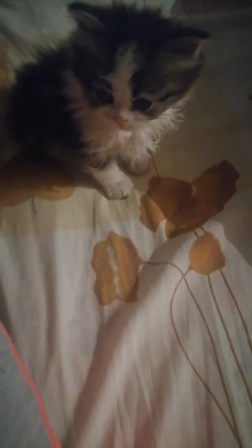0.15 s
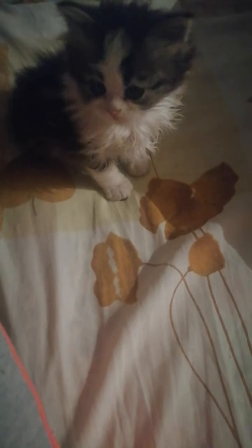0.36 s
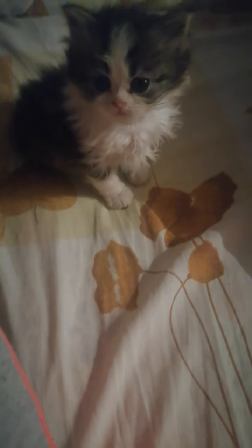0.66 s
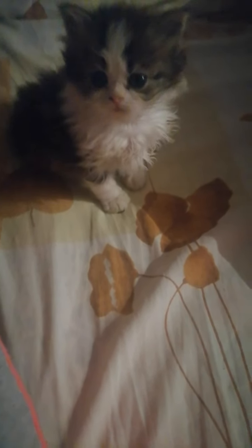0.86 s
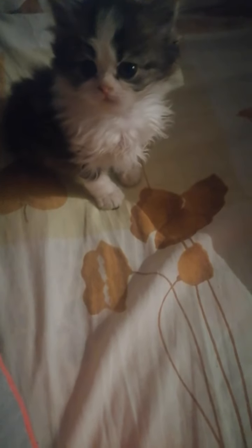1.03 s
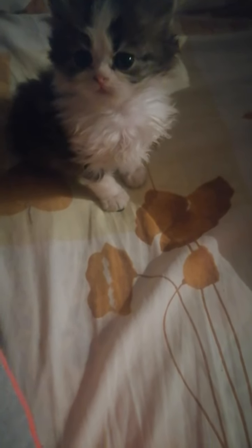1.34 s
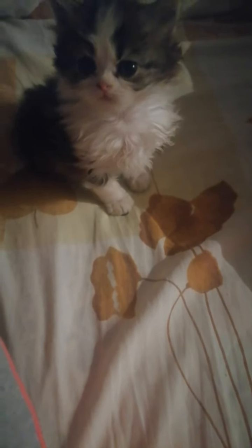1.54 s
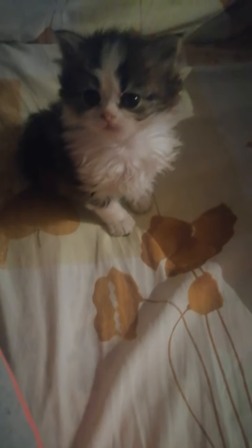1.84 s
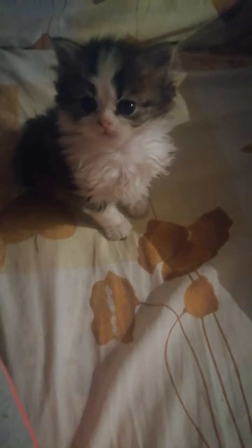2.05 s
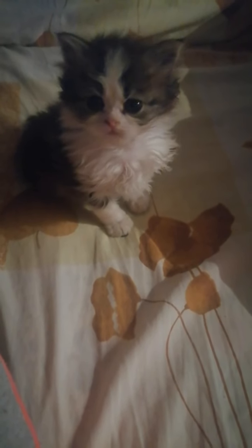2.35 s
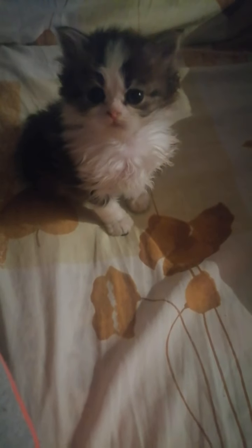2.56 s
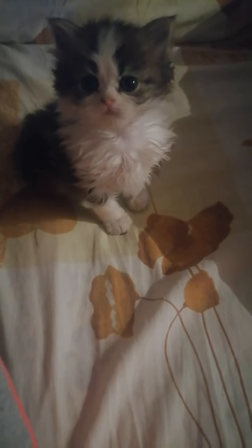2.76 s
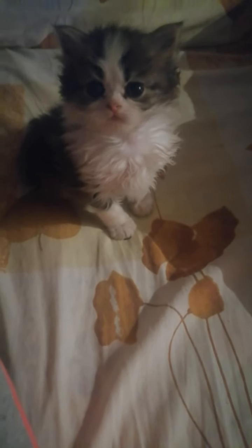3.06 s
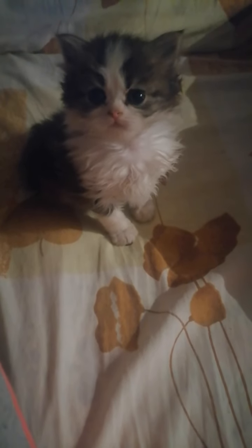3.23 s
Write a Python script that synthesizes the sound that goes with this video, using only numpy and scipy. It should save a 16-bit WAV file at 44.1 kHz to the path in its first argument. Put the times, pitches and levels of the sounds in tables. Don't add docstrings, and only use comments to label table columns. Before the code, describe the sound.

Kitten giving two brief, thin, high meows on a bed, with faint distant traffic behind.

```python
import sys
import numpy as np
from scipy import signal
from scipy.io import wavfile
from scipy.ndimage import uniform_filter1d

SR = 44100
rng = np.random.default_rng(int(sys.argv[2]) if len(sys.argv) > 2 else 0)


def ratio(d):
    e = np.asarray(d, float) / 20
    return 10 ** e


def dump_mix(stems):
    frames = np.atleast_2d(stems).T
    limited = np.clip(frames, -1, 1)
    pcm = np.round(limited * 32767).astype(np.int16)
    wavfile.write(sys.argv[1], SR, pcm)


N = 149940

# start_s [s], traffic_db [dB], air_db [dB]
SWELLS = [
    (0, -1.5, 5),
    (.4, -2.5, 7.5),
    (1.1, -5, 9.5),
    (1.45, -2.5, 2),
    (1.8, 0, 1.5),
    (2.7, -5, 0),
    (2.95, 1, -3),
    (3.4, -1.5, 3),
]


def track(rows, col):
    rows = np.array(rows, float)
    return np.interp(np.arange(N) / SR, rows[:, 0], rows[:, col])


def by_hz(table, hz):
    table = np.array(table)
    return np.interp(np.log(hz), np.log(table[:, 0]), table[:, 1])


def unit(x):
    return x / np.sqrt(np.mean(x ** 2))


def walk(rate_hz):
    k = max(int(SR / rate_hz), 1)
    once = uniform_filter1d(rng.standard_normal(N), k)
    return unit(uniform_filter1d(once, k))


def band(x, hz, width_hz):
    return signal.lfilter(*signal.iirpeak(min(hz, .45 * SR), hz / width_hz, SR), x)


def room_noise(hz, width_hz, swell_db):
    # pitch_hz [Hz], likeness [0 to 1]
    alike = [
        (130, .84),
        (290, .73),
        (640, .4),
        (1400, .15),
        (3000, 0),
    ]
    # pitch_hz [Hz], left_minus_right_db [dB]
    lean = [(200, -3), (700, -1), (2400, -3.5), (8100, 1)]
    likeness = np.clip(by_hz(alike, hz), -.9, .99)
    mid, side = band(rng.standard_normal((2, N)), hz, width_hz)
    both = np.sqrt(1 + likeness) * mid + np.sqrt(1 - likeness) * side * np.array([[1], [-1]])
    lean_db = by_hz(lean, hz) * np.array([[.5], [-.5]])
    return unit(both) * ratio(swell_db + lean_db)


def room_air():
    # pitch_hz [Hz], level_db [dB per Hz]
    room = [(12, -29), (20, 5.5), (106, -24), (137, -15.5), (166, -14), (427, -15.5), (519, -11),
            (958, -18.5), (15500, -27.5)]
    # pitch_hz [Hz], gain_db [dB]
    shell = [(2800, 5.5), (3550, -3.5), (4500, 0.5), (9000, -0.5), (11300, -7), (15500, -0.5)]
    air = 0
    for hz in 22 * 2 ** np.arange(0, 9.6, 1 / 3):
        high = hz / (hz + 3300.0)
        traffic_db = track(SWELLS, 1) + 3.6 * walk(7.6)
        air_db = track(SWELLS, 2) * (hz < 1e4)
        swell_db = (1 - high) * traffic_db + high * air_db
        noise = band(room_noise(hz, hz / 3, swell_db), hz, hz / 3)
        air = air + ratio(by_hz(room, hz) + by_hz(shell, hz)) * np.sqrt(hz) * noise
    return unit(air) * ratio(-63)


def engine_drone():
    # pitch_hz [Hz], width_hz [Hz], level_db [dB]
    room_rings = [(26, 11, -68.5), (53, 12, -62), (100.4, 18, -67), (138.25, 3, -62), (198.5, 18, -71.5),
                  (287.7, 15, -75.5), (340, 18, -78), (408, 12, -83.5), (2700, 420, -76.5),
                  (4800, 500, -79), (14800, 700, -87)]
    return sum(ratio(db) * room_noise(hz, width_hz, track(SWELLS, 1) / (1 + hz / 1300.0))
               for hz, width_hz, db in room_rings)


def street_hums():
    # middle_s [s], half_length_s [s], pitch_hz [Hz], width_hz [Hz], level_db [dB]
    hums = [(1.25, .16, 345, 50, -66), (2.93, .12, 430, 12, -67), (3.0, .02, 2205, 30, -75),
            (1.5, .13, 6645, 12, -78), (1.06, .04, 55, 25, -58), (1.3, .05, 136, 10, -62),
            (1.46, .03, 55, 25, -61), (.46, .04, 136, 10, -62), (1.12, .08, 3200, 700, -77),
            (1.8, .15, 1250, 200, -78), (2.72, .05, 620, 30, -72), (2.9, .1, 220, 160, -68),
            (1.15, .12, 90, 80, -64)]
    t = np.arange(N) / SR
    return sum(ratio(db) * room_noise(hz, width_hz, 0) * np.exp(-((t - middle_s) / half_s) ** 2)
               for middle_s, half_s, hz, width_hz, db in hums)


def vehicle_whine():
    # start_s [s], pitch_hz [Hz], level_db [dB]
    whine = [
        (1.05, 1023, -81),
        (1.22, 988, -71.5),
        (1.42, 949, -81.5),
        (1.56, 900, -74),
        (1.7, 717, -70),
        (1.85, 618, -82.5),
        (1.95, 626, -85),
    ]
    t = np.arange(N) / SR
    hz = track(whine, 1) * (1 + .018 * walk(45))
    tone = np.sin(2 * np.pi * np.cumsum(hz) / SR)
    heard = (t > whine[0][0]) * (t < whine[-1][0])
    return tone * ratio(track(whine, 2) + 5 * walk(14)) * heard


def bedroom():
    return room_air() + engine_drone() + street_hums() + vehicle_whine()


def ticks():
    # start_s [s], peak_db [dB], pitch_hz [Hz], left_minus_right_db [dB]
    tick_list = [(0.052, -59, 4800, 1), (.1435, -54, 8550, 3), (.144, -69, 13000, 0),
                 (.218, -35.5, 7850, -11), (0.228, -51, 8400, -17), (.565, -43, 7810, -7),
                 (.579, -53, 8100, 4), (.468, -54, 7800, 1), (.777, -57.5, 6560, 6), (.975, -69.5, 7500, 8),
                 (1.059, -58, 5200, -6), (1.526, -60.5, 4910, 2.5), (1.962, -53.5, 5620, -10),
                 (1.973, -56, 5510, -6), (3.293, -61.5, 4680, 11)]
    lead_s, half_length_s, sharpness = .005, .0007, 2.6
    out, t = np.zeros((2, N)), np.arange(4000) / SR
    for start_s, db, hz, pan_db in tick_list:
        burst = rng.standard_normal(4000) * np.exp(-((t - lead_s) / half_length_s) ** 2)
        for _ in range(3):
            burst = band(burst, hz, hz / sharpness)
        sides_db = db + np.array([[pan_db], [-pan_db]]) / 2
        i = int((start_s - lead_s) * SR)
        out[:, i:i + 4000] += ratio(sides_db) * burst / np.abs(burst).max()
    return out


def bedding_bumps():
    # start_s [s], peak_db [dB], pitch_hz [Hz]
    bumps = [
        (.319, -52, 750),
        (1.048, -52, 54),
        (1.18, -50, 50),
        (2.494, -42, 950),
    ]
    out, t = np.zeros((2, N)), np.arange(4000) / SR
    for start_s, db, hz in bumps:
        i = int(start_s * SR)
        out[:, i:i + 4000] += ratio(db) * np.sin(2 * np.pi * hz * t) * np.exp(-t * hz / 2.6)
    return out


def bell(hz, centre_hz, width_hz):
    return 1 - (hz / centre_hz) ** 2 + 1j * hz * width_hz / centre_hz ** 2


def vocal_tract(hz, centres_hz, widths_hz, leak):
    nose_hz, nose_width_hz = 2560, 600
    notch_hz = nose_hz + 890 * leak
    notch_width_hz = nose_width_hz + (400 - nose_width_hz) * np.abs(leak)
    nose = bell(hz, notch_hz, notch_width_hz) / bell(hz, nose_hz, nose_width_hz)
    rings = [bell(hz, centre, width) for centre, width in zip(centres_hz, widths_hz)]
    return nose / np.prod(rings, axis=0)


def meow(pitch, voice, mouth, palate, lips):
    # throat, third resonance [Hz]
    upper_widths_hz = [400, 1240]
    # left_db [dB], right_db [dB],
    # left_change_db and right_change_db [dB per % of pitch]
    bedding_path = [(-0.4, 0.5, 0.5, 0.7), (-3.1, 3.5, -0.2, 0.1), (-14.3, -1.7, -0.1, -0.9),
                    (-9.0, -16.7, 0.9, -0.2), (-13.2, -5.7, 1.2, 1.1), (-20.3, -12.0, -1.0, -0.6),
                    (-14.7, -15.6, -0.1, -1.0), (-1.1, -4.8, -0.3, 0.3), (-7.0, 1.2, -0.4, 0.6),
                    (-14.9, 2.9, -0.4, -0.6), (-13.6, 5.4, -0.1, -0.7), (-8.5, 12.5, -0.6, -0.1),
                    (5.4, 7.2, 2.1, -2.2), (13.0, 5.9, 0.5, 1.9), (12.4, 6.2, -0.9, 0.3),
                    (9.8, 4.2, -0.0, 0.1), (0.2, -2.0, 0.0, -0.0)]
    # middle_s [s], hoarseness_db [dB], half_length_s [s]
    catches = [
        (.667, -21, .004),
        (.685, -30, .003),
        (.70, -28, .004),
        (2.056, -14, .002),
        (2.09, -28, .005),
        (2.145, -30, .003),
        (2.162, -24, .005),
        (2.25, -28, .004),
        (2.295, -26, .003),
        (2.425, -28, .004),
    ]
    # start_s [s], level_db [dB re 1 radian]
    hoarseness = [
        (.45, -40),
        (.55, -41),
        (.64, -36),
        (.72, -38),
        (.85, -46),
        (2.05, -38),
        (2.2, -35),
        (2.28, -32),
        (2.4, -35),
        (2.5, -46),
    ]
    # pitch_hz [Hz], lag [radians]
    port_lag = [(600, -.1), (4300, 2.2), (5300, 1.9), (7400, 4.5), (8600, 5.6), (10500, 6.2)]
    shut_hz, shut_damp_hz = 900, 900
    pulse_skew = -1.0
    start_s, end_s = voice[0][0], voice[-1][0]
    span = slice(int((start_s - .03) * SR), int((end_s + .03) * SR))
    t = (np.arange(N) / SR)[span]

    def soft(rows, col):
        return uniform_filter1d(track(rows, col), size=400)[span]

    hz = uniform_filter1d(soft(pitch, 1), size=700) * (1 + .0015 * walk(5.7)[span])
    phase = 2 * np.pi * np.cumsum(hz) / SR
    on = uniform_filter1d(1. * (t > start_s) * (t < end_s), size=300)
    catch = sum(ratio(db) * np.exp(-((t - middle_s) / half_s) ** 2) for middle_s, db, half_s in catches)
    hoarse = ratio(soft(hoarseness, 1) + 1.2 * walk(51)[span]) + catch
    chance = walk(1100)[span]
    gust = walk(700) + 1j * walk(700)
    breath = ratio(soft(palate, 3) + 4 * walk(45)[span]) + ratio(-4) * catch

    opened = np.clip((t - lips[0]) / lips[1], 0, 1)
    centres_hz = [shut_hz + (soft(mouth, 1) - shut_hz) * opened, soft(mouth, 2), soft(mouth, 3)]
    leak = np.clip(soft(palate, 2), -1, 1.1)
    mouth_width_hz = soft(palate, 1) + shut_damp_hz * (1 - opened)
    throat_width_hz = upper_widths_hz[0] * (1 - .5 * np.maximum(leak, 0))
    widths_hz = [mouth_width_hz, throat_width_hz, upper_widths_hz[1]]

    size = np.sqrt(2) * ratio(soft(voice, 1)) * on / np.abs(vocal_tract(hz, centres_hz, widths_hz, leak))
    off_percent = 100 * (hz / 612 - 1)
    slope_db = soft(mouth, 4)
    out = np.zeros((2, N))
    for k, (left_db, right_db, left_change, right_change) in enumerate(bedding_path, 1):
        slip = hoarse * (.8 * chance + .6 * np.roll(chance, 97 * k))
        tone = vocal_tract(k * hz, centres_hz, widths_hz, leak)
        tone = tone * np.exp(1j * (k ** 1.75 * slip / 8.5 + pulse_skew))
        air = breath * (k / 2.4) ** .85 * np.roll(gust, 5003 * k)[span]
        air = air * vocal_tract((k + .5) * hz, centres_hz, widths_hz, leak) * np.exp(.5j * phase)
        tone = size * ratio(slope_db * np.log2(k)) * (tone + air) * np.exp(1j * k * phase)
        lag = np.interp(k * hz, *np.array(port_lag).T)
        out[0, span] += ratio(left_db + left_change * off_percent) * tone.imag
        out[1, span] += ratio(right_db + right_change * off_percent) * (tone * np.exp(-1j * lag)).imag
    return out


def kitten():
    # start_s [s], pitch_hz [Hz]
    pitches = [
        [(.455, 637), (.48, 619), (.525, 609.3), (.59, 620.2), (.645, 611.5), (.72, 594.3), (.81, 614.2),
         (.915, 618.6), (.975, 674)],
        [(2.025, 579), (2.075, 633), (2.14, 628.6), (2.22, 618.2), (2.29, 596.2), (2.38, 591.2), (2.49, 634.6),
         (2.555, 639.6), (2.63, 755)],
    ]
    # start_s [s], level_db of the fundamental [dB]
    voices = [
        [(.455, -56), (.471, -32.5), (.515, -27), (.63, -29.5), (.69, -29.5), (.84, -29.5), (.9, -32.5),
         (.925, -39.5), (.975, -84.5)],
        [(2.025, -53), (2.04, -28), (2.075, -28), (2.2, -29.5), (2.36, -31), (2.5, -31.5), (2.55, -35),
         (2.615, -57.5), (2.65, -91.5)],
    ]
    # start_s [s], mouth_hz [Hz], throat_hz [Hz], upper_hz [Hz] of a third, higher resonance,
    # source_slope_db [dB per octave]
    mouths = [
        [(.475, 3030, 5190, 8630, -13.5), (.51, 3170, 5330, 8200, -12.5), (.545, 2920, 5230, 8100, -9.5),
         (.585, 2210, 4800, 8370, -6), (.63, 1966, 4290, 7130, -4), (.71, 1750, 3980, 6330, -6),
         (.79, 1236, 4600, 6720, -4.5), (.84, 1038, 4890, 7590, -6.5), (.97, 1017, 4830, 8460, -8)],
        [(2.05, 2900, 5470, 7610, -10), (2.095, 3200, 5350, 8900, -10.5), (2.14, 3080, 5450, 8700, -7.5),
         (2.175, 2600, 4537, 7300, -5), (2.21, 2004, 3970, 7240, -1.5), (2.36, 1837, 3840, 6730, -3.5),
         (2.44, 1188, 4570, 7140, -4), (2.54, 975, 4320, 7560, -4.5), (2.64, 1223, 4630, 9060, -14)],
    ]
    # start_s [s], mouth_width_hz [Hz], leak [nasal notch from below -1 to above +1 of the nose ring],
    # breath_db [dB re the tone]
    palates = [
        [(.46, 300, -0.73, -23), (.49, 202.2, -0.19, -50), (.53, 298, -0.038, -52.5), (.57, 525, 0, -33.5),
         (.62, 236, 0.036, -42.5), (.70, 223.6, 0.024, -39.5), (.78, 216, 0.34, -39.5), (.85, 236, 0.9, -41.5),
         (.95, 231, 1, -40)],
        [(2.04, 300, 0.03, -30), (2.065, 300, 0.03, -31), (2.1, 230, 0.0033, -36), (2.17, 500, 0.03, -41),
         (2.22, 241, 0.0033, -40.5), (2.3, 241, 0.0033, -35.5), (2.41, 237, 0.067, -33.5),
         (2.46, 235, 0.26, -36), (2.53, 233, 0.98, -45)],
    ]
    # part_s [s], opening_time_s [s]
    lip_moves = [
        (.453, .024),
        (2.052, .028),
    ]
    return sum(meow(*call) for call in zip(pitches, voices, mouths, palates, lip_moves))


def room_tail(cat):
    t60_s, top_hz = 0.57, 840
    t = np.arange(SR // 2) / SR
    tail = rng.standard_normal((2, SR // 2)) * ratio(-60 * t / t60_s) * np.minimum(t / .02, 1)
    tail = signal.lfilter(*signal.butter(2, top_hz, fs=SR), tail)
    tail = tail / np.sqrt(np.sum(tail ** 2) / 2)
    return ratio(-37.5) * signal.fftconvolve(cat.mean(0)[None], tail, axes=1)[:, :N]


def turn_down(cat):
    duck_db, duck_from_db, duck_s = -4, -39, 0.046
    power = uniform_filter1d(np.mean(cat ** 2, 0), int(duck_s * SR))
    return ratio(duck_db * power / (power + ratio(2 * duck_from_db)))


def scene():
    cat = kitten()
    return cat + room_tail(cat) + turn_down(cat) * bedroom() + ticks() + bedding_bumps()


def roll_off(x):
    return signal.sosfilt(signal.butter(12, 15690, fs=SR, output="sos"), x)


def record(dry):
    return roll_off(dry)


dry = scene()
out = record(dry)
dump_mix(out)
```